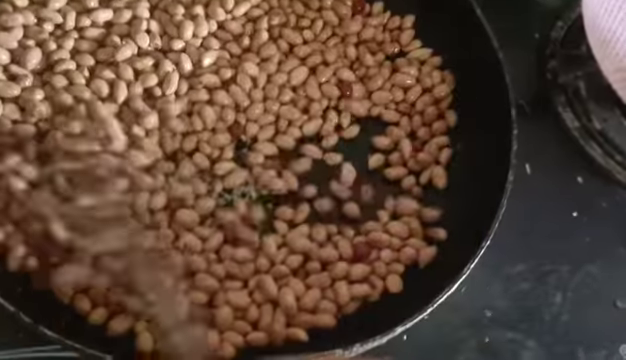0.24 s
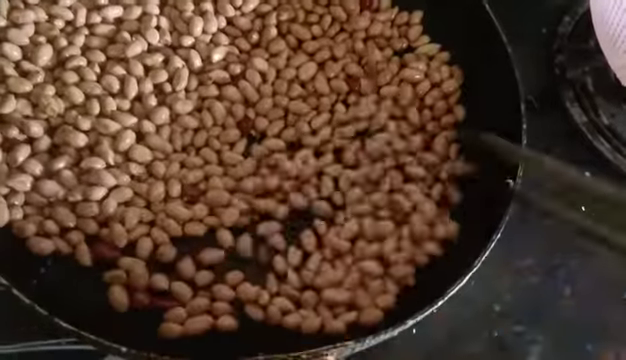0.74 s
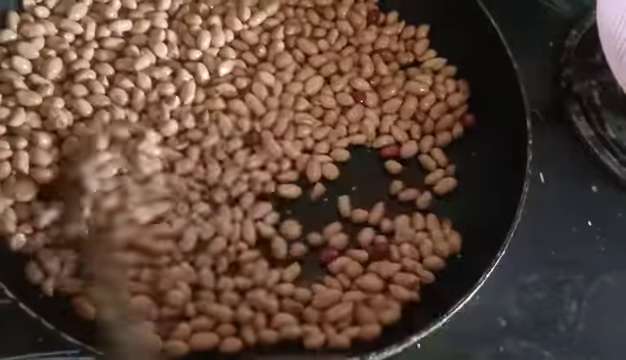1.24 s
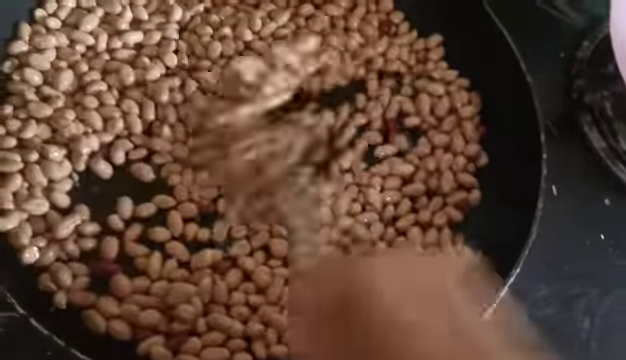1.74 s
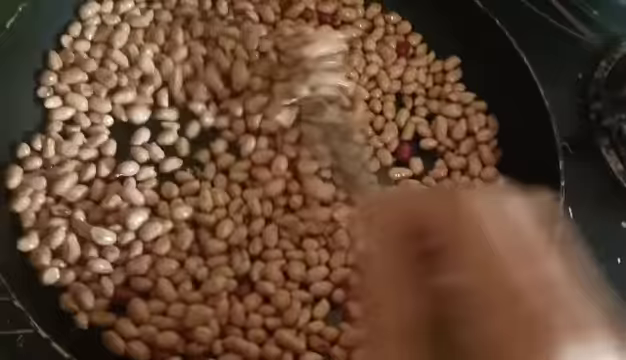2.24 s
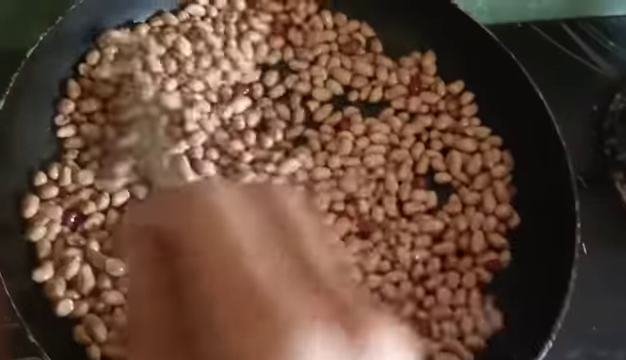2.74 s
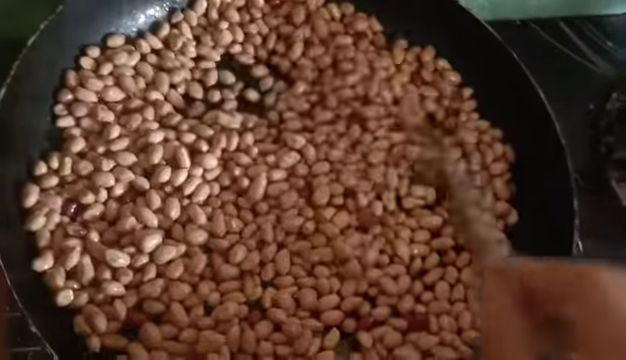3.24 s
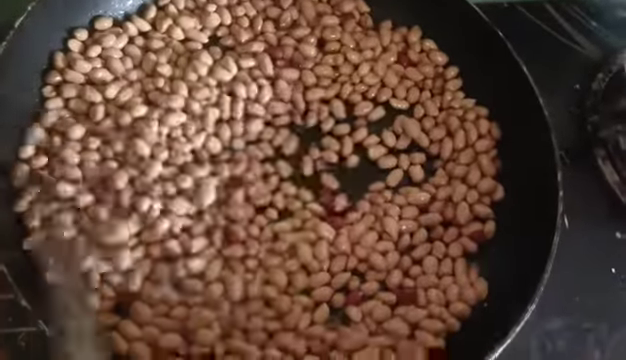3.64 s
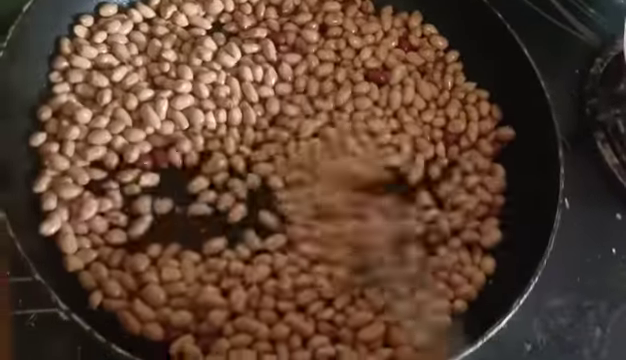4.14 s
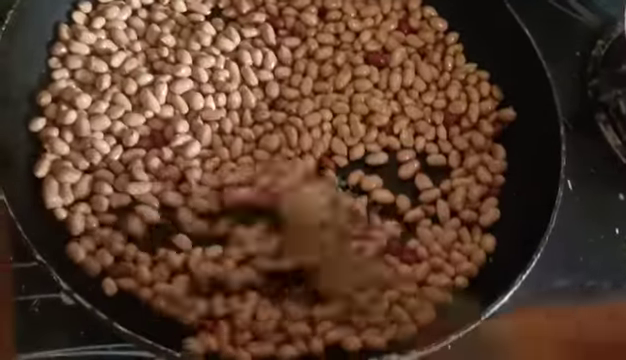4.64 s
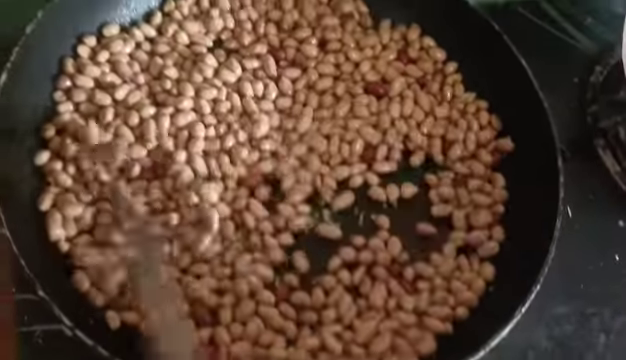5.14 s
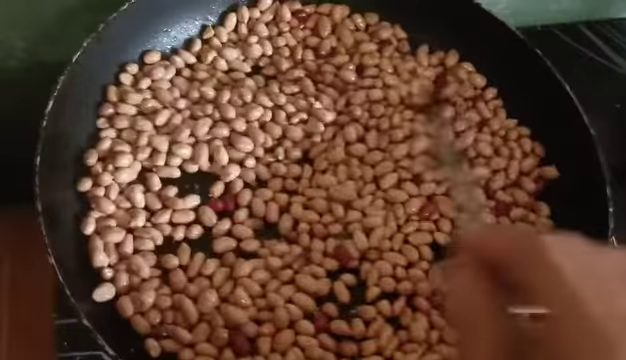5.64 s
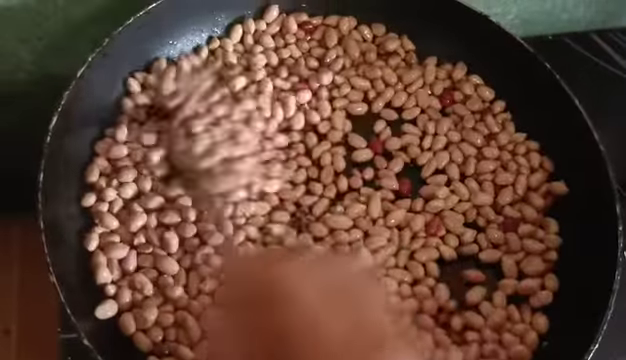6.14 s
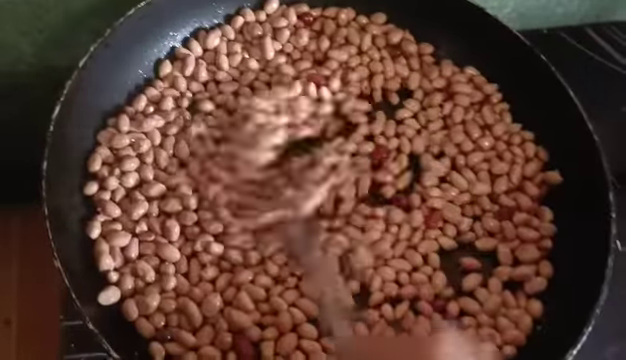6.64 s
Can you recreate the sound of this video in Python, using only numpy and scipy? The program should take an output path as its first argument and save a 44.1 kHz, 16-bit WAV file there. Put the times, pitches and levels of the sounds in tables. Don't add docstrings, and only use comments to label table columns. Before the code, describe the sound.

Close up, steel tongs sweep peanuts around a frying pan about two and a half times a second. Each stroke swells into a dense clacking rattle with hard knocks and metallic scraping, then drops quickly. Skins crackle and pop over a faint hiss, light taps fall between strokes, and burner and fan rumble low. Small hard kitchen, phone microphone, right side brighter and overloading.

```python
import sys
import numpy as np
from scipy import signal
from scipy.fft import rfft, irfft
from scipy.io import wavfile
from scipy.ndimage import uniform_filter1d

SR = 44100
rng = np.random.default_rng(int(sys.argv[2]) if len(sys.argv) > 2 else 0)


def materialize(psi):
    bounded = np.clip(np.atleast_2d(psi).T, -1, 1)
    quanta = np.round(bounded * 32767).astype(np.int16)
    wavfile.write(sys.argv[1], SR, quanta)


def makeup_ratio(level_db):
    decades = np.asarray(level_db, float) / 20
    return 10 ** decades


N = 303136


def in_time(rows):
    s, *columns = np.transpose(rows)
    return [np.interp(np.arange(N) / SR, s, c) for c in columns]


def rms_one(x):
    return x / np.sqrt(np.mean(x ** 2) + 1e-20)


def butter(x, order, hz, kind="low"):
    return signal.sosfilt(signal.butter(order, hz, kind, fs=SR, output="sos"), x)


def colour(x, points):
    hz, db = np.transpose(points)
    grid = np.maximum(np.fft.rfftfreq(4096, 1 / SR), 5)
    cepstrum = irfft(np.log(makeup_ratio(np.interp(np.log(grid), np.log(hz), db))))
    cepstrum[1:2048] *= 2
    cepstrum[2049:] = 0
    impulse = irfft(np.exp(rfft(cepstrum)))[None, :3072]
    return signal.oaconvolve(x, impulse, axes=1)[:, :N]


def drift(rate_hz):
    r = np.exp(-2 * np.pi * rate_hz / SR)
    wander = signal.lfilter([1], [1, -2 * r, r * r], rng.standard_normal(N + SR))
    return rms_one(wander[SR:])


def pairs(count, alike):
    alike = np.clip(alike, 0, 1)
    shared, own = rng.standard_normal((count, 2)).T
    return np.sqrt(1 + alike) * shared + np.sqrt(1 - alike) * own * [[1], [-1]]


def train(at, sizes):
    return np.array([np.bincount(at, side, N)[:N] for side in sizes]) + 1e-18


def strike(at, sizes, modes, alike, damp, centre_hz=1000, slope_db=0, shift_db=0):
    out = 0
    for hz, db, t60 in modes:
        r = makeup_ratio(-60 / (t60 * damp * SR))
        w = 2 * np.pi * hz / SR
        load = np.interp(at / N, np.linspace(0, 1, 90), rng.standard_normal(90))
        octaves_off = np.abs(np.log2(hz / centre_hz))
        reach = makeup_ratio(db - slope_db * octaves_off + shift_db * load)
        clicks = train(at, sizes * reach * pairs(len(at), alike))
        out = out + signal.lfilter([0, np.sin(w)], [1, -2 * r * np.cos(w), r * r], clicks)
    return out


def grains(per_s, spread_db, largest, count):
    place, keep, size = rng.random((count, 3)).T
    at = (place * N).astype(int)
    born = keep < per_s[at] * N / SR / count
    size_db = spread_db * np.minimum(-np.log(size + 1e-9), largest)
    return at, born * makeup_ratio(size_db) / np.sqrt(per_s[at])


def puffs(at, sizes, fade_s):
    shape = signal.lfilter([1], [1, -np.exp(-1 / (fade_s * SR))], np.bincount(at, sizes, N)[:N])
    return shape * rng.standard_normal((2, N))


# frequency in Hz, density in dB per Hz.
RUMBLE = [(12, -51), (20, 10), (261, 5), (332, 1.5), (637, 2.5), (718, -12), (809, -6), (1010, -12),
          (1200, -0.5), (1560, -26.5), (2640, -120)]
# frequency in Hz, level in dB.
HUM = [(54, -55), (149, -52), (259, -43)]


def kitchen():
    rumble = makeup_ratio(-36.5) * rms_one(colour(pairs(N, 0.82), RUMBLE)) * makeup_ratio(1.5 * drift(6))
    tones = 0
    r = np.exp(-np.pi * 12 / SR)
    for hz, db in HUM:
        resonance = [1, -2 * r * np.cos(2 * np.pi * hz / SR), r * r]
        tones = tones + makeup_ratio(db) * rms_one(signal.lfilter([1], resonance, pairs(N, 1.0)))
    return rumble + tones


# full force from in seconds, build-up in seconds, hold in seconds, rattle in dB, pitch centre in Hz.
STROKES = [(0.0, .1, 0.11, -10, 1220), (0.366, 0.024, 0.15, -26, 1200), (0.497, .15, 0.096, -16, 1160),
           (0.811, 0.056, 0.12, -12.5, 1180), (1.218, 0.072, 0.13, -13.5, 1450),
           (1.627, 0.098, .13, -11.5, 1300), (2.07, 0.073, 0.13, -16, 824), (2.273, 0.11, 0.067, -27, 1030),
           (2.528, 0.12, 0.095, -13.5, 850), (2.923, 0.15, 0.068, -13, 810),
           (3.087, .06, 0.067, -30.5, 1080), (3.263, 0.046, 0.098, -10.5, 1160),
           (3.721, 0.14, 0.1, -10.5, 1290), (4.056, 0.091, 0.11, -13.5, 980), (4.537, 0.13, .1, -16, 1010),
           (4.857, 0.1, 0.11, -14, 1140), (5.03, .05, 0.072, -42, 1200), (5.264, 0.15, .16, -15.5, 1200),
           (5.698, 0.12, 0.097, -10.5, 960), (6.13, 0.094, .11, -11.5, 835),
           (6.504, 0.12, 0.079, -10, 1000), (6.865, 0.02, 0.027, -23, 1200)]
# time in seconds, level in dB.
BEARING = [(0.08, -1), (0.55, -3.5), (0.87, 1), (1.25, -0.5), (1.7, 1), (2.14, 4.5), (2.58, -3.5),
           (2.97, 1), (3.32, 4.5), (3.78, 0.5), (4.13, 4), (4.58, 2.5), (4.92, 1), (5.34, 1.5), (5.75, -7),
           (6.19, -3), (6.55, 2)]
BUILD_DB, SETTLE_DB_PER_S = 27.5, 192.5
REST_DB, REST_HZ = -45, 1200
THINNING_OCT_PER_S = 0.2
LIGHT_OCT_PER_DB = 0.02
SCRAPE_DB, SCRAPE_FOLLOWS = -15, 0.97


def stirring():
    t = np.arange(0, N / SR + .01, .002)
    start, build, hold, db, hz = np.transpose(STROKES)[:, :, None]
    building_db = BUILD_DB * np.maximum(start - t, 0) / build
    settling_db = SETTLE_DB_PER_S * np.maximum(t - start - hold, 0)
    short_db = building_db + settling_db
    power = makeup_ratio(2 * (db - short_db))
    thinning = THINNING_OCT_PER_S * np.clip(t - start - hold / 2, -.15, .3)
    octaves = np.log2(hz) + thinning + LIGHT_OCT_PER_DB * np.minimum(short_db, 25)
    rest = makeup_ratio(2 * REST_DB)
    total = power.sum(0) + rest
    centre = ((power * octaves).sum(0) + rest * np.log2(REST_HZ)) / total
    level_db = uniform_filter1d(10 * np.log10(total), size=15)
    bearing_db = np.interp(t, *np.transpose(BEARING))
    scrape_db = SCRAPE_DB - (1 - SCRAPE_FOLLOWS) * (level_db + 14) + bearing_db
    return in_time(np.c_[t, level_db, scrape_db, 2 ** centre])


# frequency in Hz, level in dB, 60 dB decay in seconds.
PAN = [(470, -2, 0.056), (544, -14.5, 0.12), (699, 0, 0.059), (735.3, -7, 0.56), (856, -1.5, 0.069),
       (953.5, -5, 0.16), (1010, -5, 0.087), (1070, -3, 0.13), (1169, -7.5, 0.08), (1300, -5.5, 0.038),
       (1414, -10.5, 0.052), (1490, -8.5, 0.053), (1558, -16.5, 0.085), (1700, -1.5, 0.025),
       (1828, -9, 0.12), (1893, -2, 0.034), (2069, -3.5, 0.069), (2255, -1.5, 0.025), (2395, -13, 0.15)]
# frequency in Hz, level in dB, 60 dB decay in seconds.
RIM = [(2500, -2, .02), (2640, -3, .045), (2900, -2, .02), (3300, -3, .035), (3650, -3, .015),
       (4100, -3, .02), (4550, -3, .015), (5050, -8, .025)]


def rattle():
    level_db, scrape_db, centre_hz = stirring()
    per_s = np.clip(330 * makeup_ratio(.5 * (level_db + 18.0) + 4.0 * drift(40)), 220, 1400)
    at, sizes = grains(per_s, spread_db=3.0, largest=0.77, count=10000)
    body = rms_one(strike(at, sizes, PAN, alike=0.68, damp=0.71, centre_hz=centre_hz[at],
                          slope_db=6, shift_db=3.5))
    rim = rms_one(strike(at, sizes, RIM, alike=0.035, damp=0.7, shift_db=7.5))
    nuts = [(hz, 0, 22 / hz) for hz in np.geomspace(800, 4400, 11)]
    at, sizes = grains(per_s * .45, spread_db=4.0, largest=2.6, count=6000)
    clack = rms_one(strike(at, sizes, nuts, alike=0.12, damp=0.61, centre_hz=centre_hz[at],
                           slope_db=6, shift_db=1.5))
    return makeup_ratio(level_db - 2.5) * (body + makeup_ratio(-7.0) * clack + makeup_ratio(scrape_db + 5.5) * rim)


# time in seconds, crackle in dB.
HEAT = [
    (0, -27.5),
    (1.2, -31),
    (2.2, -28),
    (3.6, -26.5),
    (4.3, -30.5),
    (5.4, -30.5),
    (6.87, -29.5),
]
# start in seconds, peak in dB, top end over the peak in dB.
POPS = [(0.2633, -25, -25), (0.6614, -16, -18), (0.7505, -16, -1.5), (0.7793, -23, -24), (0.8155, -19, -14),
        (1.0044, -18.5, -24), (1.192, -17, -29), (1.3745, -42, -25), (1.7678, -16.5, -20),
        (1.8531, -37, -27), (2.228, -27, -24), (2.5855, -12, -26), (2.9866, -9, -21), (3.2189, -17, -17),
        (3.534, -18.5, -22), (3.6257, -14, -20), (3.8598, -20, -17), (4.1627, -11, -25), (4.3151, -20, 0),
        (4.4563, -21, -26), (4.698, -18.5, -30), (4.964, -32, -18), (4.997, -20, -26), (5.313, -12.5, -13),
        (5.3535, -14.5, -33), (5.7954, -27, -25), (6.0237, -23.5, -25), (6.1719, -16.5, -38),
        (6.3695, -13.5, -28), (6.7471, -20.5, -20)]


def crackle():
    heat_db, = in_time(HEAT)
    at, sizes = grains(350 * makeup_ratio(3.0 * drift(9.9)), spread_db=4.0, largest=2.6, count=12000)
    fine = rms_one(butter(puffs(at, sizes, fade_s=0.0014), 1, 6000))
    steam = makeup_ratio(-40) * rng.standard_normal((2, N))
    level_db, scrape_db, _ = stirring()
    husks_db = 0.73 * level_db + 0.61 * scrape_db - 10.5 + 3.3 * drift(26)
    husks = makeup_ratio(husks_db) * rng.standard_normal((2, N))
    hiss = butter(steam, 1, 14000) + butter(husks, 3, 9500)
    s, peak_db, top_db = np.transpose(POPS)
    at = (s * SR).astype(int)
    dull = butter(puffs(at, makeup_ratio(peak_db + 8), fade_s=0.0024), 2, [3300, 6800], "band")
    sharp = butter(puffs(at, makeup_ratio(peak_db + top_db + 9), fade_s=0.00075), 3, 6800, "high")
    bursts = makeup_ratio(heat_db - 4.5) * fine + hiss + dull + sharp
    return butter(bursts, 2, 1800, "high")


# start in seconds, peak in dB, pitch centre in Hz.
KNOCKS = [(0.062, -0.5, 1070), (0.479, -4.5, 1070), (0.559, -11, 1130), (0.806, 3.5, 1490),
          (0.848, 4, 1370), (0.917, -2, 1030), (1.24, 5, 1300), (1.34, 2.5, 1670), (1.632, 3, 1010),
          (1.73, 5, 1550), (2.133, -1.5, 695), (2.54, -3, 1010), (2.589, 6, 1010), (2.899, -4, 910),
          (2.944, 0.5, 875), (2.992, 7, 950), (3.273, 5, 1180), (3.362, 2, 1000), (3.772, 0, 1900),
          (4.053, -0.5, 1930), (4.152, 5.5, 740), (4.545, 0, 1180), (4.871, 1.5, 730), (4.939, -4, 1840),
          (4.964, 4.5, 1670), (5.266, -0.5, 1020), (5.352, -0.5, 1830), (5.697, -1.5, 1070),
          (5.795, 5.5, 1040), (6.162, 0, 724)]
# start in seconds, peak in dB,
# bright part over the peak in dB, pitch centre in Hz, low jolt through the stand in dB.
TAPS = [(0.365, -9, 1, 1300, -23.5), (0.66, 5.5, -16, 1200, -30.5), (1.099, -14, -8, 1200, -48),
        (1.193, -28, -17, 1270, -46), (1.994, -25, -12, 900, -27), (2.055, -12, -3, 1300, -33),
        (2.391, -3.5, -19, 880, -21.5), (2.472, -11, -18, 1810, -31.5), (3.086, -8, -15, 1700, -28),
        (3.196, -11, -12, 1150, -35), (3.62, -16, 4, 1420, -20.5), (3.995, -18, -18, 1100, -36),
        (4.455, 0.5, -5, 1780, -22.5), (4.788, -2.5, -9.5, 1180, -38), (5.043, -15.5, 3, 1900, -54),
        (5.081, -8.5, -12, 1400, -47), (5.118, -16.5, -20, 1500, -49), (5.192, -2.5, -3, 1000, -26),
        (5.938, -20, -22, 1500, -49), (5.989, -19.5, 4, 2290, -45), (6.045, -40, -12, 900, -23),
        (6.1, -10, -20, 690, -26), (6.37, -39, -15, 1100, -45), (6.818, -15, -0.5, 1100, -45)]
TAP_SLOPE_DB, KNOCK_SLOPE_DB = 12, 15
KNOCK_BRIGHT_DB = -9.5


def knocks():
    rows = [(s, db, bright, hz, TAP_SLOPE_DB) for s, db, bright, hz, _ in TAPS]
    rows += [(s, db, KNOCK_BRIGHT_DB, hz, KNOCK_SLOPE_DB) for s, db, hz in KNOCKS]
    s, peak_db, bright_db, centre_hz, slope_db = np.repeat(rows, 5, axis=0).T
    skid_s = np.cumsum(.003 * rng.random((len(rows), 5)), axis=1).ravel() - .002
    tap_swell_db = np.tile([-2, 0, -2, -5, -8], len(TAPS))
    knock_swell_db = np.tile([-9, -3, 0, -1, -5], len(KNOCKS))
    touch_db = peak_db + np.r_[tap_swell_db, knock_swell_db]
    at = np.clip((s + skid_s) * SR, 0, N - 1).astype(int)
    body = strike(at, makeup_ratio(touch_db - 16.5), PAN, alike=0.53, damp=0.69,
                  centre_hz=centre_hz, slope_db=slope_db)
    bright = strike(at, makeup_ratio(touch_db + bright_db - 14.5), RIM, alike=0.057, damp=0.9)
    return body + bright


def thuds():
    s, jolt_db = np.repeat(TAPS, 4, axis=0).T[[0, 4]]
    rock_s = np.cumsum(.022 * rng.random((len(TAPS), 4)), axis=1).ravel()
    # Hz, dB, 60 dB decay in seconds
    modes = [(112, -19, 0.1), (170, -2.5, 0.099), (215, 2.0, 0.07), (283, -1.5, 0.13), (410, 5, 0.076)]
    at = ((s + rock_s) * SR).astype(int)
    return butter(strike(at, makeup_ratio(jolt_db - 8), modes, alike=0.92, damp=1), 2, 350)


def walls(x, t60, level_db):
    t = np.arange(int(.2 * SR)) / SR
    tail = rng.standard_normal((2, len(t))) * makeup_ratio(-60 * t / t60) * (t > .004)
    tail = tail / np.sqrt(np.sum(tail ** 2, 1))[:, None]
    return makeup_ratio(level_db) * signal.oaconvolve(x, tail, axes=1)[:, :N]


def scene():
    pan = butter(rattle() + knocks(), 4, 520, "high") + crackle()
    return pan + walls(pan, t60=0.18, level_db=-9.5) + thuds() + kitchen()


def drop_faint(x, gate_db, masking, scatter_db):
    _, _, cells = signal.stft(x, SR, "cosine", 2048, 1024)
    power = np.abs(cells[:, :1024]) ** 2 + 1e-20
    band_db = 10 * np.log10(power.reshape(2, 128, 8, -1).mean(2))
    loud_db = 10 * np.log10(power.sum(1, keepdims=True))
    threshold_db = gate_db + masking * (loud_db + 20)
    kept = band_db > threshold_db + scatter_db * rng.standard_normal(band_db.shape)
    cells[:, 128:1024] *= np.repeat(kept, 8, axis=1)[:, 128:]
    return signal.istft(cells, SR, "cosine", 2048, 1024)[1][:, :N]


def roll_off(x):
    return signal.sosfilt(signal.butter(12, 16790, fs=SR, output="sos"), x)


# frequency in Hz, response in dB.
LEFT_MIC = [(300, -7.5), (700, -5.5), (1050, 1), (1400, -2), (2200, -3), (3000, -5.5), (4100, -4.5),
            (5500, -12.5), (6300, -12), (7200, -2.5), (8500, -1), (11000, -6), (14300, -6), (15500, -72)]
# frequency in Hz, response in dB.
RIGHT_MIC = [(300, -6), (700, 1.5), (1050, 0.5), (1450, 9), (2200, 4), (3100, -4.5), (4200, -1.5),
             (5100, 10.5), (6000, 14.5), (6800, -9), (7700, -100), (9000, -27), (12500, -5), (15000, -1)]


def record(dry):
    heard = np.vstack([colour(dry[:1], LEFT_MIC), colour(dry[1:], RIGHT_MIC)])
    bent = heard / (1 + (heard / 1.15) ** 4) ** .25
    top_cut = signal.cheby2(14, 50, 16050, fs=SR, output="sos")
    cut = signal.sosfilt(top_cut, np.clip(bent, -1, 1))
    thinned = drop_faint(cut, gate_db=-74, masking=.25, scatter_db=4.5)
    return roll_off(thinned)


dry = scene()
out = record(dry)
materialize(out)
```